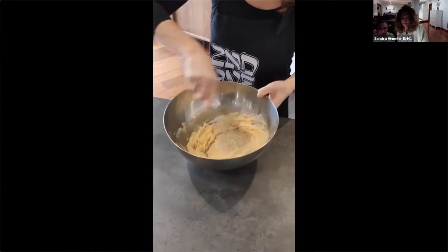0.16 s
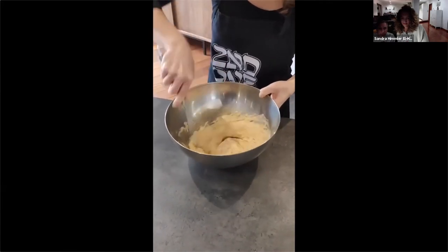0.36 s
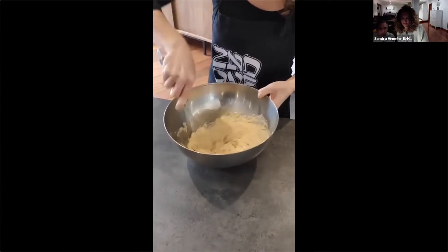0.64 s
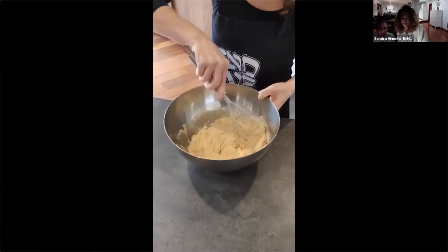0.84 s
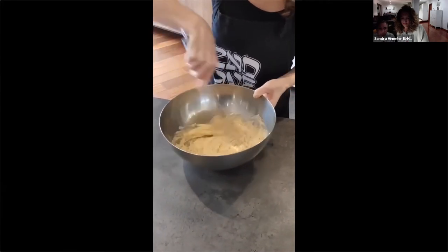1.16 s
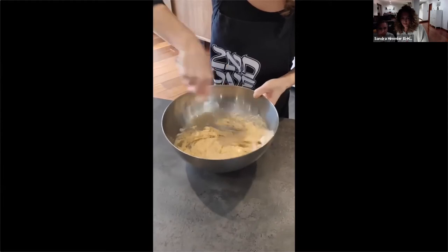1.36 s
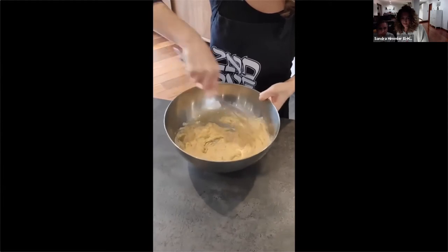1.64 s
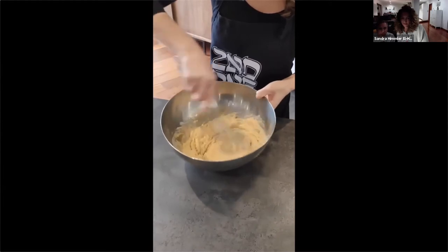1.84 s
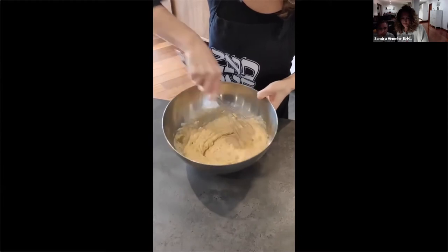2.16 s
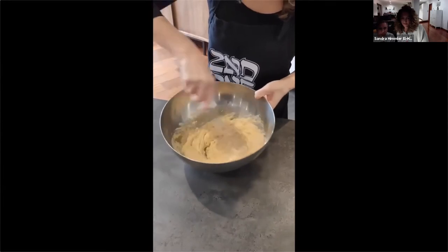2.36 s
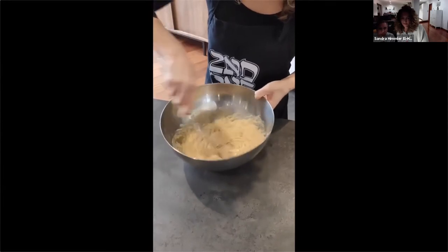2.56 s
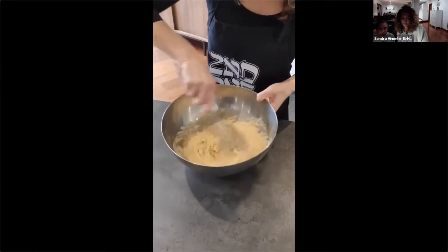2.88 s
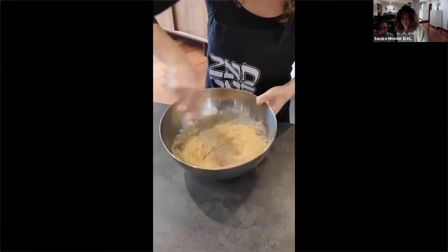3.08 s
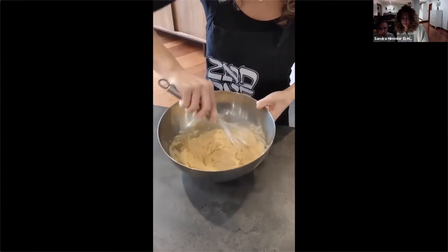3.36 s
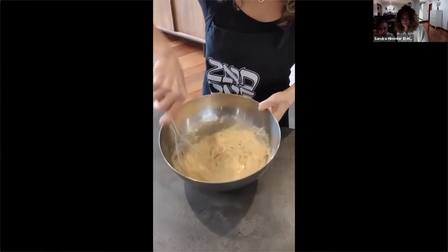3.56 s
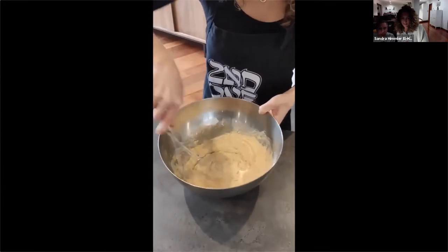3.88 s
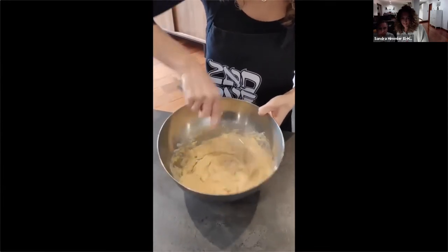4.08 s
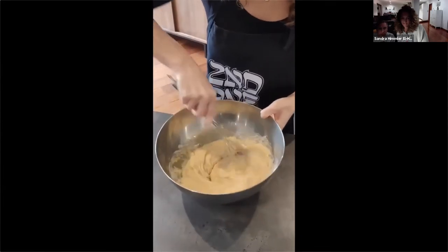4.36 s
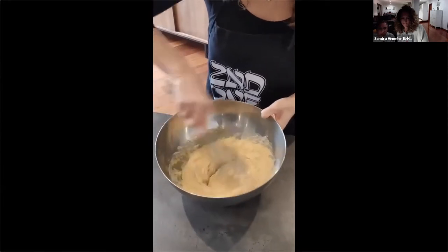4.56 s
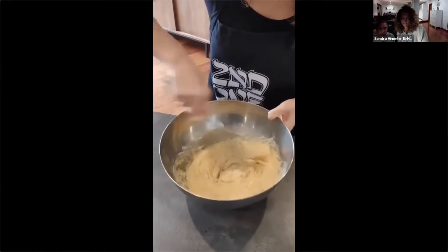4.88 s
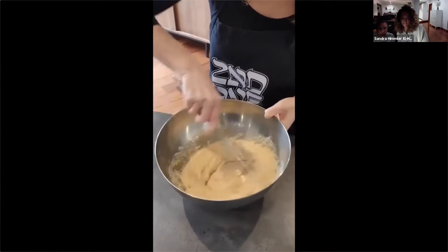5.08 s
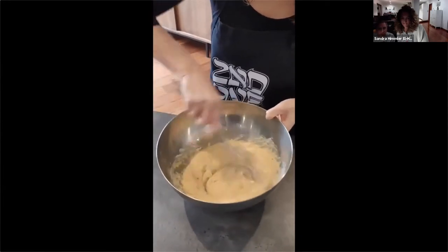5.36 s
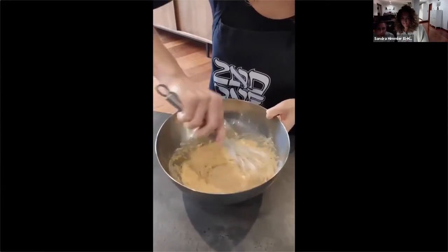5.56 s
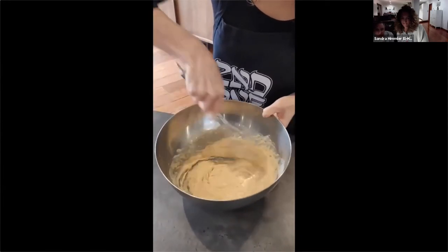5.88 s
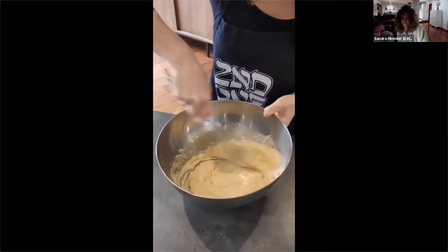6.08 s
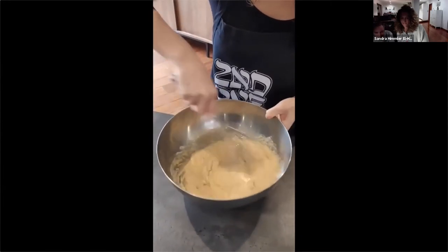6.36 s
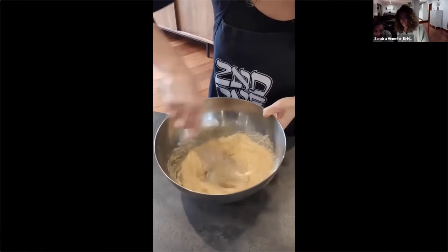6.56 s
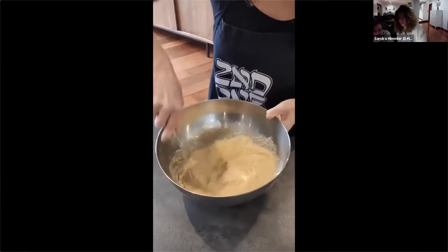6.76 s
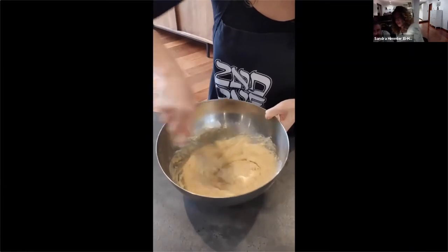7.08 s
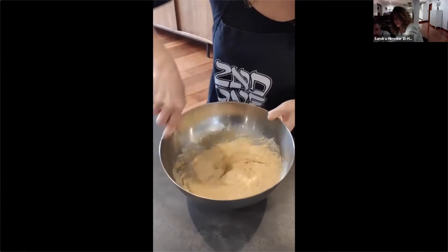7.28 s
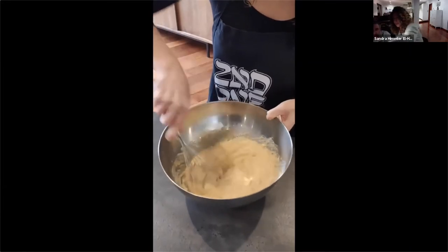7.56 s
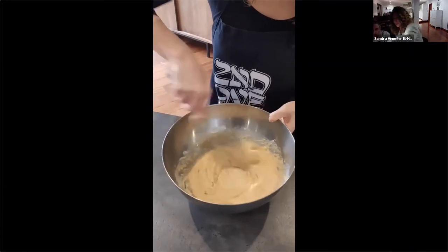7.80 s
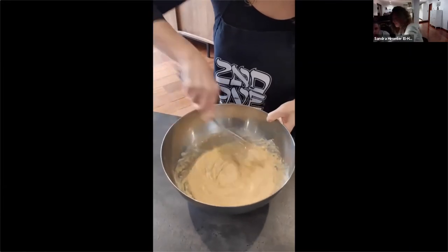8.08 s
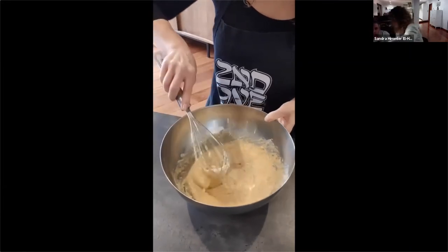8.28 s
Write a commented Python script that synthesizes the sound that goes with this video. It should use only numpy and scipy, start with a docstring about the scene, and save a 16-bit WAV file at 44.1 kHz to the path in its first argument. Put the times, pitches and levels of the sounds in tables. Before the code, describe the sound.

A metal whisk beats thick batter in a steel bowl at three to four strokes a second. Bright, gritty wire scraping mixes with sharp clinking slaps, sticky squelches and short throaty gulps. The bowl rumbles and bumps dully on the counter. Near the eighth second the whisk lifts out and the scraping fades quickly to faint room air. Close microphone, small kitchen with short reverberation.

```python
"""A wire whisk beats thick batter in a hand-held steel bowl, with three to four pushes a second.
Stick-slip friction makes the wires scrape over the steel; they also graze it and slap against it.
The batter squelches as air pockets and larger hollows ring, and the bowl rumbles as it is nudged.
The loaded bowl bumps dully on a kitchen counter, over faint room air.
At the end the whisk is lifted out, and its scraping and squelching fade quickly."""
import sys
import numpy as np
from scipy import signal
from scipy.fft import rfft, irfft
from scipy.io import wavfile
from scipy.ndimage import uniform_filter1d, map_coordinates

SR = 44100
rng = np.random.default_rng(int(sys.argv[2]) if len(sys.argv) > 2 else 0)


def output_pcm(signal):
    """Save a mono or channel-first signal as 16-bit PCM at the path in sys.argv[1].

    Samples are clipped to [-1, 1] before scaling.
    """
    pcm = np.clip(np.atleast_2d(signal).T, -1, 1) * 32767
    wavfile.write(sys.argv[1], SR, np.round(pcm).astype(np.int16))


N = 371763
TIME = np.arange(N) / SR


def from_db(db):
    """Decibel law: level to amplitude gain."""
    return 10 ** (np.asarray(db) / 20)


def rms_one(x):
    """Normalisation: scale a sound to unit mean power."""
    return x / np.sqrt(np.mean(x ** 2) + 1e-20)


def through(x, response):
    """Linear filtering: convolve a sound with an impulse response."""
    return signal.fftconvolve(x, response)[:len(x)]


def response_of(spectrum, size=8192):
    """Minimum phase: the folded cepstrum of a spectrum gives a causal response, here of unit energy."""
    hz, db = np.transpose(spectrum)
    grid = np.maximum(np.fft.rfftfreq(size, 1 / SR), 1)
    level_db = np.interp(np.log(grid), np.log(hz), db)
    cepstrum = irfft(np.log(from_db(level_db)))
    cepstrum[1:size // 2] *= 2
    cepstrum[size // 2 + 1:] = 0
    response = irfft(np.exp(rfft(cepstrum)))
    return response / np.linalg.norm(response)


def drift(rate):
    """Random modulation: straight lines join normal random values drawn rate times a second."""
    knots = rng.standard_normal(20000)
    return np.interp(TIME * rate, np.arange(len(knots)), knots)


def resonance(x, hz, t60):
    """Damped oscillator: one mode with about unit gain at its peak, falling 60 dB in t60 seconds."""
    r = from_db(-60 / (t60 * SR))
    feed = np.array([1, 0, -1]) * (1 - r * r) / 2
    feedback = [1, -2 * r * np.cos(2 * np.pi * hz / SR), r * r]
    return signal.lfilter(feed, feedback, x + 1e-18)


def clicks(per_s, spread_db):
    """Poisson-like impacts: impulses at random times, of uneven size and either sign."""
    spread = spread_db * np.clip(rng.standard_normal(N), -2, 2)
    sizes = from_db(spread) * rng.choice([-1, 1], N)
    return sizes * (rng.random(N) < per_s / SR)


def steady(x, span_s):
    """Power normalisation: hold the running power near 1 over a span, keeping the finer grain."""
    power = uniform_filter1d(x ** 2, max(int(span_s * SR), 2))
    return x / np.sqrt(np.maximum(power, 0) + 1e-3 * np.mean(x ** 2))


def wandering(x, depth_db, rate, width_hz, size=256):
    """Shifting resonance: a random gain field recolours the spectrum; each frame keeps its energy."""
    hz, s, spectra = signal.stft(x, SR, nperseg=size)
    place = np.meshgrid(hz / width_hz, s * rate, indexing="ij")
    field = map_coordinates(rng.standard_normal((200, 1500)), place, order=1, mode="mirror")
    coloured = spectra * from_db(depth_db * field)
    coloured *= np.linalg.norm(spectra, axis=0) / (np.linalg.norm(coloured, axis=0) + 1e-20)
    return signal.istft(coloured, SR, nperseg=size)[1][:N]


# the whisk pushes through the batter; levels are before the pressure changes and the layer trims
# columns: start_s, length_s, wire_level_db, batter_level_db
STROKES = [(0, 0.1, -22.5, -33), (0.309, 0.047, -20.5, -31.5), (0.583, 0.035, -21, -31.5),
           (0.875, 0.031, -21.5, -35), (1.09, 0.084, -24.5, -35.5), (1.44, 0.094, -25, -34.5),
           (1.679, 0.24, -25, -35), (1.946, 0.21, -26, -35), (2.21, 0.16, -24.0, -33),
           (2.476, 0.057, -24.5, -32.5), (2.731, 0.057, -23.5, -31), (2.993, 0.035, -20.5, -31.5),
           (3.445, 0.039, -17.5, -50), (3.545, 0.17, -24, -43.0), (3.811, 0.3, -24.5, -44),
           (4.401, 0.11, -26, -36), (4.658, 0.098, -26.5, -33), (4.91, 0.087, -24.5, -34.5),
           (5.2, 0.084, -21.5, -34.5), (5.52, 0.23, -21.5, -44), (5.686, 0.16, -20.5, -45.0),
           (6.04, 0.0, -24.5, -34.5), (6.165, 0.03, -21.5, -35), (6.332, 0.21, -28, -39),
           (6.673, 0.064, -23, -42), (6.93, 0.11, -24.0, -37.0), (7.192, 0.1, -25, -46),
           (7.455, 0.058, -22, -44), (7.659, 0.037, -26, -39.5), (7.822, 0.013, -27.5, -34.5)]


def beating(attack_s=0.033, release_s=0.042, drag_wires_db=-28.5, drag_batter_db=-39.5):
    """Driving force, as wire and batter levels in dB: pushes swell, hold and fall to a waning drag."""
    wires, batter, idle_s = 0, 0, TIME
    for s, length_s, wire_db, batter_db in STROKES:
        after_s = np.maximum(TIME - s - length_s, 0)
        away = np.maximum((s - TIME) / attack_s, after_s / release_s)
        push = np.exp(-np.minimum(away, 20))
        wires = np.maximum(wires, from_db(wire_db) * push)
        batter = np.maximum(batter, from_db(batter_db) * push)
        idle_s = np.where(TIME >= s, after_s, idle_s)
    sag_db = 19.5 * idle_s  # the drag between pushes weakens by 19.5 dB per second
    # the hand's pressure is never quite even
    uneven_db = 1.43 * drift(24)
    # at the end the whisk is lifted out: levels fade by 146 dB per second from 7.984 s
    lift_db = 146 * np.maximum(TIME - 7.984, 0)
    pressure_db = uneven_db - clearance() - lift_db
    wire_level = np.maximum(20 * np.log10(wires), drag_wires_db - sag_db) + pressure_db
    batter_level = np.maximum(20 * np.log10(batter), drag_batter_db - sag_db) + pressure_db
    return wire_level, batter_level


# ring of the wires on steel, relative levels per Hz; columns: pitch_hz, level_db
WIRE_SPECTRUM = [(500, -31), (2000, -26), (3300, -25), (4600, -13.5), (5600, -7), (6600, -2), (7600, 2),
                 (8200, -1.5), (8700, -9), (10000, -15), (11500, -22.5), (14300, -34.5)]


def scrape(level_db, slips_per_s=500, slip_s=0.0036, slip_spread_db=5.0, grip_db=9.5, hiss=0.75):
    """Stick-slip friction: each slip of a wire is a brief noise burst that sets the wires ringing."""
    fade = np.exp(-1 / (slip_s * SR))
    releases = np.abs(clicks(slips_per_s, slip_spread_db)) + 1e-18
    slips = rms_one(signal.lfilter([1], [1, -fade], releases))
    grip = from_db(grip_db * np.clip(drift(130), -1.3, 1.3))
    friction = (slips + hiss) * grip * rng.standard_normal(N)
    return through(steady(friction, 0.0079) * from_db(level_db), response_of(WIRE_SPECTRUM))


# wet batter in the bowl, relative levels per Hz; columns: pitch_hz, level_db
BATTER_SPECTRUM = [(200, 4), (380, -10), (520, 2.5), (750, -2.5), (1100, -1), (1400, -7.5), (1800, -4.5),
                   (2300, -5.5), (2520, -1.5), (2900, -5), (3800, -1), (6000, -4.5), (14000, -12)]


def squelch(level_db, pops_per_s=1100, cycles=26.7, clump_db=1.5, crackle_db=0.5, count=30):
    """Cavity resonance: bursting air pockets ring at their own pitches amid sticky crackle."""
    tearing = from_db(clump_db * drift(70))
    pops = clicks(pops_per_s, 2.35) * tearing
    dealt = rng.integers(0, count, N)  # which pocket each pop excites
    pitches = np.geomspace(380, 4200, count)
    pockets = sum(resonance(pops * (dealt == k), hz, cycles / hz) for k, hz in enumerate(pitches))
    crackle = clicks(3500, 11.0) * tearing
    mixture = rms_one(pockets) + from_db(crackle_db) * rms_one(crackle)
    wet = through(mixture, response_of(BATTER_SPECTRUM))
    coloured = wandering(wet, depth_db=5.5, rate=25, width_hz=269, size=512)
    return steady(coloured, 0.23) * from_db(level_db)


def grazes(level_db, per_s=32, spread_db=5.0, fade_s=0.0021, ring_db=-6.5, body_db=-18.0):
    """Cushioned impact: between slaps, single wires tick on the wall through a film of batter."""
    t = TIME[:SR // 20] / fade_s
    touches = through(np.abs(clicks(per_s, spread_db)), t * np.exp(1 - t))
    ticks = rms_one(np.tanh(touches)) * rng.choice([-1, 1], N) * from_db(level_db)
    ring = from_db(ring_db) * through(ticks, response_of(WIRE_SPECTRUM))
    body = from_db(body_db) * through(ticks, response_of(BATTER_SPECTRUM))
    return ring + body


# colour of the rocking bowl, relative levels per Hz; columns: pitch_hz, level_db
RUMBLE_SPECTRUM = [(20, -23), (44, -11), (66, -8.5), (100, -6.5), (138, 8), (175, -7.5), (212, 2.5),
                   (260, -17), (340, -17.5), (420, -20.5), (900, -41)]
# the bowl rocks in the hand; levels are before the rumble trim; columns: time_s, level_db
ROCKING = [(0.0, -37.5), (1.03, -43.5), (1.2, -36.5), (1.57, -39), (2.37, -37), (2.6, -39.5), (3.05, -36.5),
           (3.45, -48), (3.69, -36), (3.87, -34.5), (5.3, -35), (5.66, -45.5), (6.2, -35.5), (6.74, -42),
           (7.39, -41), (8.15, -43.5), (8.31, -51.5), (8.43, -63)]


def rumble(trim_db=2.5, nudges_per_s=55, spread_db=1.0, even_s=0.16):
    """Random excitation of low modes: the dragged whisk keeps nudging the bowl."""
    s, rocking_db = np.transpose(ROCKING)
    level_db = np.interp(TIME, s, rocking_db) + trim_db
    nudges = through(clicks(nudges_per_s, spread_db), response_of(RUMBLE_SPECTRUM))
    return steady(nudges, even_s) * from_db(level_db)


# quiet kitchen, relative levels per Hz; columns: pitch_hz, level_db
AIR_SPECTRUM = [(25, 4), (44, -14.5), (70, 1), (140, -4), (400, -18), (1500, -30), (7000, -33.5),
                (14000, -49)]


def room_air(level_db=-47):
    """Broadband background: filtered noise at a steady level."""
    return from_db(level_db) * through(rng.standard_normal(N), response_of(AIR_SPECTRUM))


# low modes of bowl and counter, before the ring trim; columns: pitch_hz, level_db, t60_s
BOWL_MODES = [(44, 8.5, 0.28), (109, 1.5, 0.12), (139.6, 3, 0.21), (167.5, -2, 0.51), (211.9, 8.5, 0.19),
              (328.4, 16, 0.16), (466.5, 18, 0.25)]
# bowl bumps the counter, timed at the middle of the swing; columns: time_s, drive_level_db, pitch_hz
BUMPS = [(0.012, -27, 167), (0.139, -23.5, 146), (0.387, -28, 167), (0.563, -28, 159), (0.664, -21, 130),
         (0.739, -23.5, 160), (0.915, -22, 144), (1.062, -15.5, 155), (1.205, -27.5, 166), (1.31, -20, 150),
         (1.369, -27.5, 194), (1.543, -15, 135), (1.779, -21, 156), (2.04, -17.5, 171), (2.254, -20, 183),
         (2.325, -18.5, 158), (2.508, -19, 164), (3.036, -21.5, 172), (3.098, -22, 168), (3.358, -21, 156),
         (3.915, -26.5, 136), (4.012, -17.5, 135), (4.143, -12.5, 179), (4.582, -22, 147), (4.77, -21, 145),
         (5.014, -21, 144), (5.078, -24, 152), (5.275, -24, 145), (5.623, -23, 106), (5.97, -16.5, 163),
         (6.078, -17.5, 126), (6.108, -24, 140), (6.222, -18, 132), (6.356, -16.5, 135), (7.038, -28, 139),
         (7.304, -23.5, 136), (7.406, -25.5, 125), (7.876, -26.5, 132.5), (7.955, -31, 151),
         (8.187, -30.5, 139), (8.223, -35.5, 136)]


def bumps(swing_cycles=0.49, ring_db=3.5, edge_db=-2.0, push_db=-28.0):
    """Damped impact: each bump is one short swing plus a slow push, and drives the low modes."""
    swings = np.zeros(N)
    for s, drive_db, hz in BUMPS:
        near = np.abs(TIME - s) < .04
        turns = (TIME[near] - s) * hz
        contact = from_db(drive_db) * np.exp(-.5 * (turns / swing_cycles) ** 2)
        push = from_db(push_db) * turns / swing_cycles
        swings[near] -= contact * (np.sin(2 * np.pi * turns) + push)
    # harder bumps make a rougher contact, which reaches the other modes
    force = swings + from_db(edge_db) * swings ** 2 * drift(1100)
    rings = sum(from_db(db) * resonance(force, hz, t60) for hz, db, t60 in BOWL_MODES)
    return force + from_db(ring_db) * rings


def clearance(clear_s=0.039, clear_db=3.5):
    """Loss of contact, in dB: it grows as the wires spring clear before a slap and ends as they land."""
    loss_db = np.zeros(N)
    for s, _, _ in SLAPS:
        free = (TIME > s - clear_s) & (TIME < s)
        loss_db[free] = clear_db * (1 - (s - TIME[free]) / clear_s)
    return loss_db


# wires slap the bowl hard; levels drive the ring and body, before their trims
# columns: start_s, drive_level_db, body_level_db (relative to the drive)
SLAPS = [(0.185, -11.5, -21), (0.332, -13, -14.5), (0.611, -16, -9), (0.681, -16.5, -13),
         (0.8147, -14, -20), (0.859, -25, -8), (0.897, -11.5, -26), (1.108, -13, -23), (1.574, -11, -44),
         (1.771, -15, -29), (1.856, -10.5, -14), (1.894, -17.5, -17.5), (2.0327, -14.5, -13),
         (2.127, -11, -16.5), (2.211, -22.5, -9), (2.311, -19, -18), (2.38, -17, -6), (2.8832, -13, -11),
         (2.988, -23, -7), (3.089, -14.5, -16.5), (3.1431, -11, -24), (3.369, -12.5, -19.5),
         (3.417, -19, -10.5), (3.552, -12.5, -38), (3.745, -16, -21), (3.813, -21.5, -7.5),
         (3.968, -13.5, -13.5), (4.024, -8.5, -24), (4.139, -16.5, -7.5), (4.311, -15.5, -25),
         (4.4252, -12, -12), (4.465, -13.5, -17), (4.555, -15.5, -12), (4.657, -13, -15),
         (4.8026, -10, -16.5), (5.036, -18, -13), (5.0696, -9.5, -15), (5.208, -17, -14.5),
         (5.3445, -8.5, -17.5), (5.5158, -9.5, -29), (5.562, -11.5, -21), (5.85, -14, -30),
         (5.896, -13.5, -20), (6.101, -16.5, -15), (6.153, -16.5, -18), (6.277, -11.5, -17),
         (6.4, -12, -15), (6.5594, -10.5, -22), (6.666, -18, -7.5), (6.71, -16, -11), (6.825, -11.5, -33),
         (6.94, -19, -11), (7.109, -9.5, -25), (7.262, -16, -19), (7.303, -15.5, -12),
         (7.369, -13.5, -16.5), (7.546, -14.5, -8), (7.647, -16, -11.5), (7.7662, -20.5, -18),
         (7.817, -13, -19), (7.888, -13.5, -17.5)]


def slaps(ring_db=1.5, body_db=7.0, rattle_s=0.01455, contact_s=0.0019, falloff_db=10.0,
          count=7, size=3000):
    """Multiple impact: wires land in quick succession, ringing and shaking the loaded bowl."""
    wires, body, t = np.zeros(N + size), np.zeros(N + size), TIME[:size]
    order = np.arange(count) / count
    for s, drive_db, body_rel_db in SLAPS:
        # the first wire lands on time, the others at random within rattle_s
        scatter = rng.random(count) * (order > 0) / count
        landings = rattle_s * (order + scatter) ** 2
        age = t - landings[:, None]
        decay = (age >= 0) * np.exp(-np.abs(age) / contact_s)
        onset = np.tanh(2 * age / contact_s)
        contacts = decay * onset * from_db(-falloff_db * order)[:, None]
        envelope = np.tanh(np.linalg.norm(contacts, axis=0))
        burst = envelope * rng.choice([-1, 1], size) * from_db(drive_db)
        start = int(s * SR)
        wires[start:start + size] += burst
        body[start:start + size] += burst * from_db(body_rel_db)
    ring = from_db(ring_db) * through(wires[:N], response_of(WIRE_SPECTRUM))
    thud = from_db(body_db) * through(body[:N], response_of(BATTER_SPECTRUM))
    return ring + thud


# large hollows open behind the whisk, timed at the strongest tearing; levels are before the gulp trim
# columns: time_s, level_db, pitch_hz
GULPS = [(0.369, -32.5, 575), (0.698, -32, 620), (1.507, -32.5, 696), (1.687, -31.5, 1040),
         (2.05, -36, 1070), (2.065, -38, 1540), (2.09, -35, 613), (2.32, -37, 790), (2.47, -33, 1620),
         (3.033, -34, 496), (3.463, -34, 930), (4.146, -31, 450), (5.528, -32, 710), (6.051, -36, 1060),
         (5.039, -36, 1150), (5.268, -41, 1660), (6.171, -30, 553), (7.019, -35, 522), (7.268, -29.5, 555),
         (7.308, -41, 826), (7.673, -30.5, 960)]


def gulps(trim_db=5.0, width_s=.013, cycles=13):
    """Cavity resonance: batter tears open over a hollow, giving the crackle a short, throaty ring."""
    out, crackle = np.zeros(N), clicks(2000, 2.3)
    for s, db, hz in GULPS:
        near = np.abs(TIME - s) < .06
        tear = crackle[near] * np.exp(-.5 * ((TIME[near] - s) / width_s) ** 2)
        ring = resonance(tear, hz, cycles / hz)
        out[near] += from_db(db + trim_db) * ring / np.abs(ring).max()
    return out


def kitchen(x, t60=0.29, wet_db=-5.0, first_echo_s=.003, count=8):
    """Diffuse reverberation: decaying noise tails, mixed anew as the contacts move about the bowl."""
    t, wet = TIME[:SR // 2], 0
    places = np.array([drift(70) for _ in range(count)])
    for share in places / np.linalg.norm(places, axis=0):
        tail = rng.standard_normal(len(t)) * from_db(-60 * t / t60) * (t > first_echo_s)
        wet = wet + through(x * share, tail / np.linalg.norm(tail))
    return x + from_db(wet_db) * wet


def scene(scrape_db=-3.0, squelch_db=-3.0):
    """Superposition: wires and batter ring in the kitchen; bowl and air are added directly."""
    wire_level, batter_level = beating()
    contacts = scrape(wire_level + scrape_db) + grazes(wire_level) + slaps()
    # the wires bend and their contact points slide, so their colour never stays put
    wires = wandering(contacts, depth_db=5.0, rate=55, width_hz=440.0)
    batter = squelch(batter_level + squelch_db) + gulps()
    bowl = bumps() + rumble()
    return (kitchen(wires + batter) + bowl + room_air())[None]


def record(dry, top=0.45, dip_hz=7950, cutoff_hz=14350):
    """Saturation and filtering: the highest peaks are rounded, the treble dips narrowly, the top is cut."""
    rounded = dry / (1 + (dry / top) ** 4) ** (1 / 4)
    dipped = signal.lfilter(*signal.iirnotch(dip_hz, 70, fs=SR), rounded)
    lowpass = signal.ellip(10, .3, 70, cutoff_hz, fs=SR, output="sos")
    return signal.sosfilt(lowpass, dipped)


dry = scene()
out = record(dry)
output_pcm(out)
```